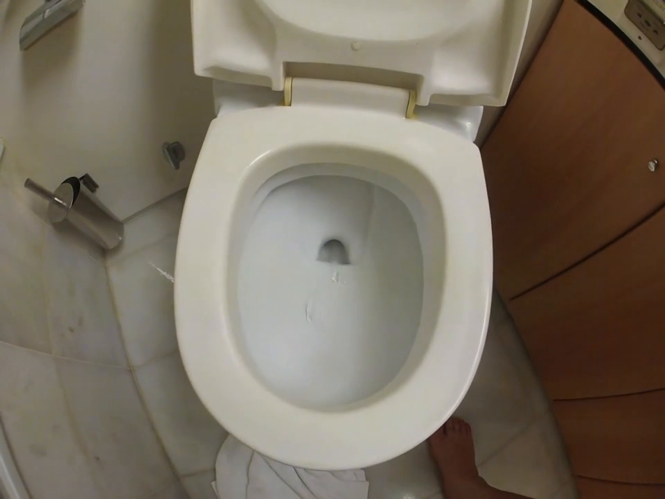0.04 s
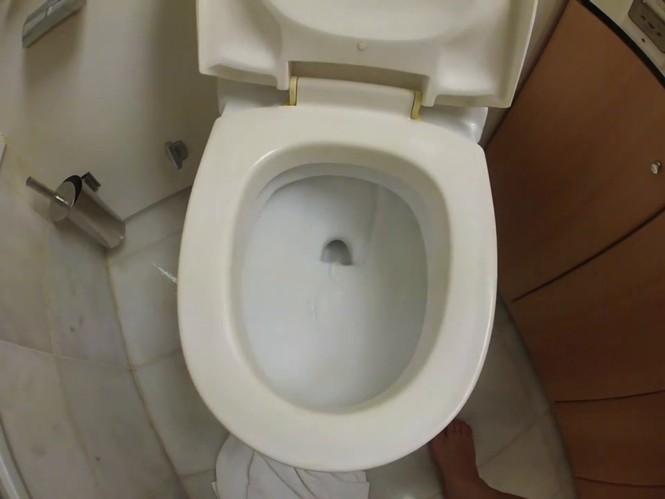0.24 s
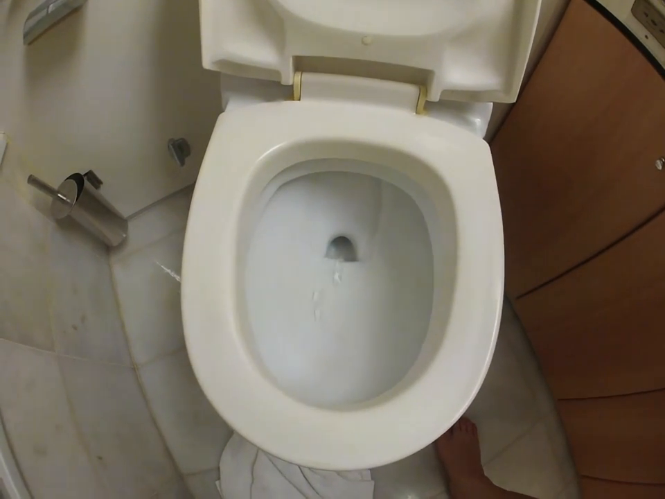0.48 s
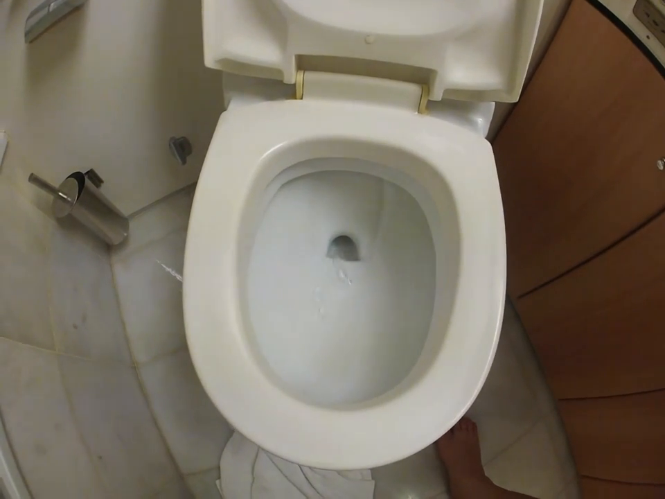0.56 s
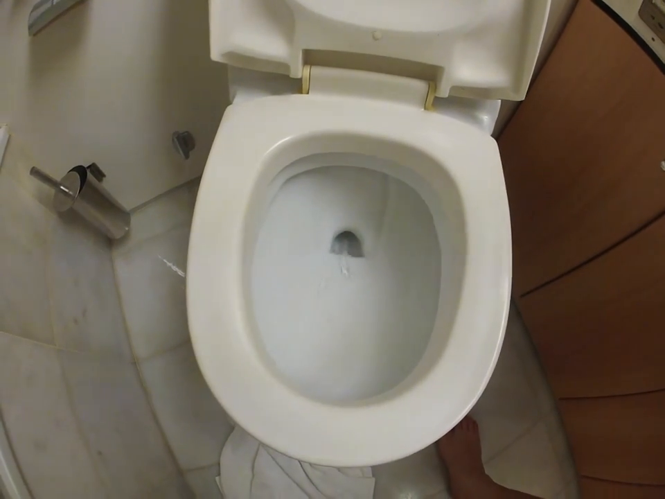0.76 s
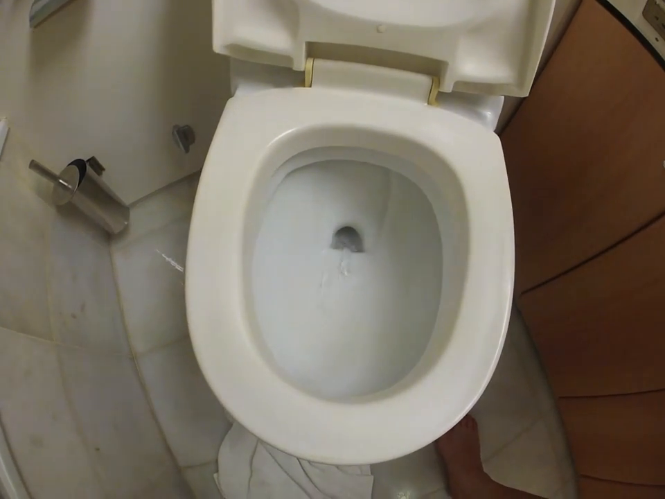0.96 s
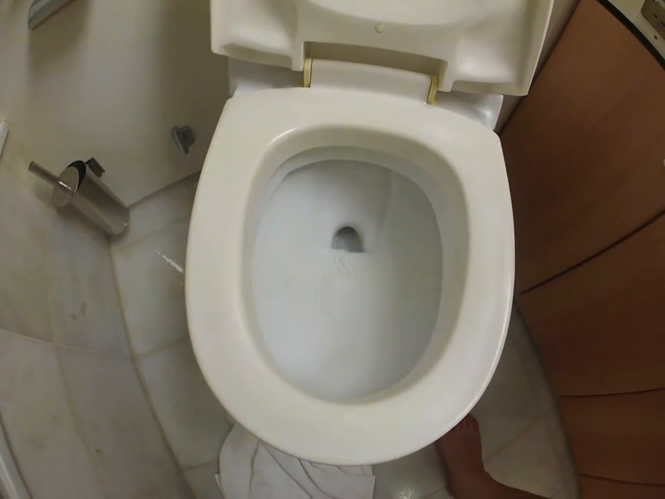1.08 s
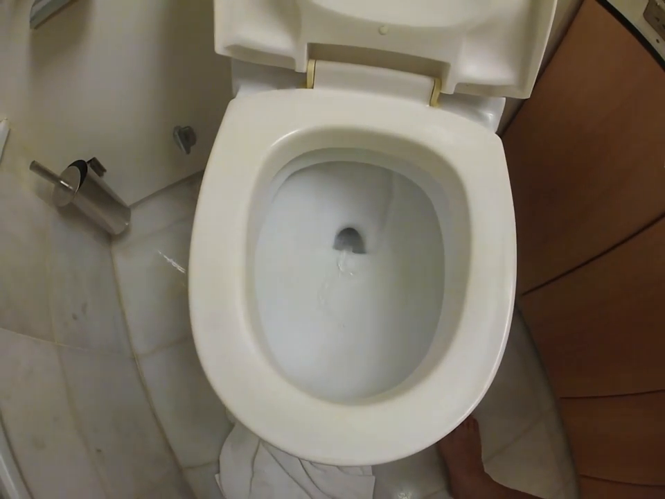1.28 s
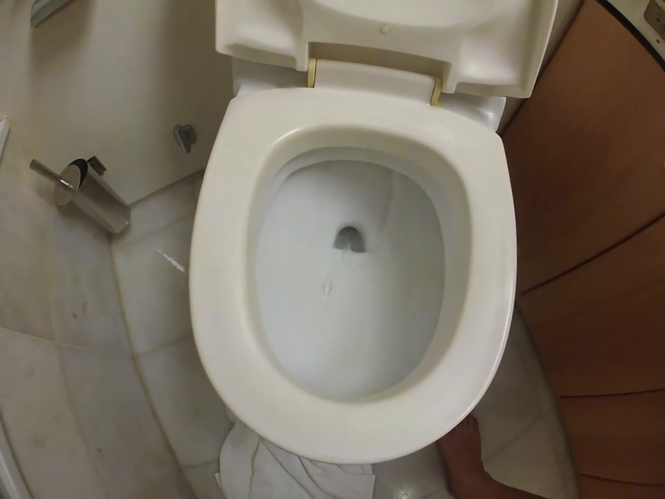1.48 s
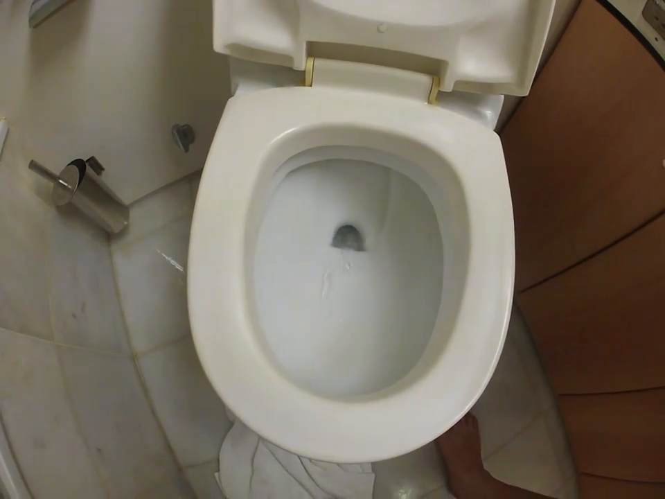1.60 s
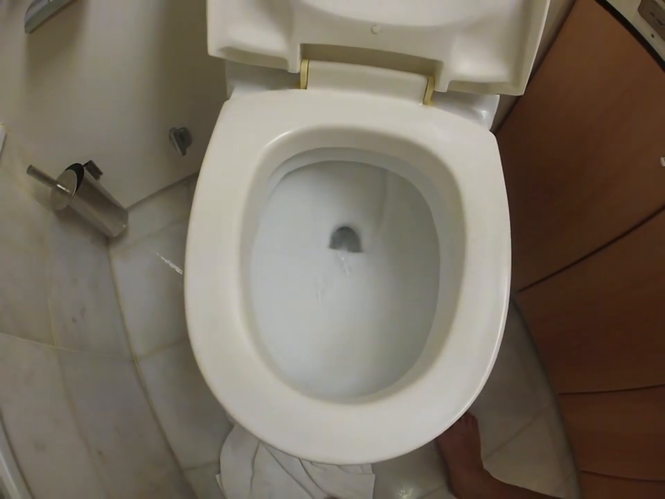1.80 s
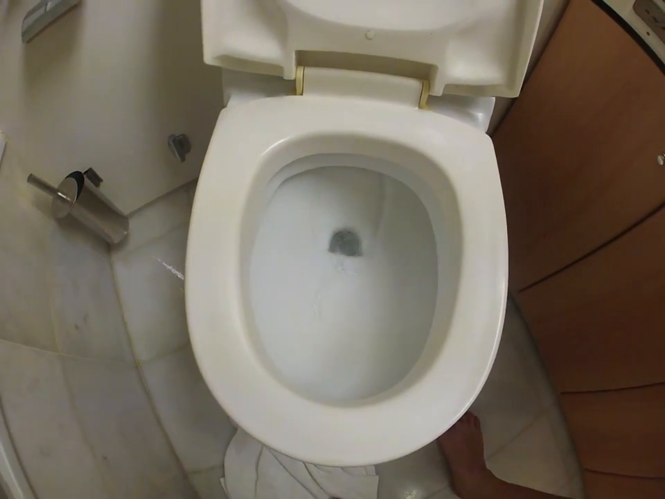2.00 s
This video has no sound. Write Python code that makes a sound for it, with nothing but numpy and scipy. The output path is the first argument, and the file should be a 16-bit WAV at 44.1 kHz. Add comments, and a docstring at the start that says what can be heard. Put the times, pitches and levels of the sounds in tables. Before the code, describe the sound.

A vacuum toilet flush rushes and booms in the bowl, then ends with a gulp and a hissing sputter. Faint trickling, drips and small plops follow, heard close by in a small bathroom.

```python
"""Vacuum toilet flush

Air rushes down the drain and booms in the bowl, then slurps, gulps and sputters as the valve closes.
The small bathroom rings out over a low background rumble. The last water trickles and drips into
the bowl, with fizzing bubbles and a few plops from the drain."""
import sys
import numpy as np
from scipy import signal
from scipy.fft import rfft, irfft
from scipy.io import wavfile
from scipy.ndimage import uniform_filter1d

SR = 44100
rng = np.random.default_rng(int(sys.argv[2]) if len(sys.argv) > 2 else 0)


def master(y):
    """Save y as 16-bit WAV."""
    cut = np.clip(np.atleast_2d(y).T, -1, 1)
    pcm = np.round(cut * 32767)  # scale
    wavfile.write(sys.argv[1], SR, pcm.astype(np.int16))


N = 90404
T = np.arange(N) / SR
HZ = np.fft.rfftfreq(2 * N, 1 / SR)


def undb(db):
    """Decibels to gain."""
    return 10 ** (np.asarray(db) / 20)


def unit(x):
    """Scale to rms 1."""
    return x / np.sqrt(np.mean(x ** 2))


def steady(x, samples):
    """Ride the level to rms 1 over a sliding window."""
    return x / np.sqrt(uniform_filter1d(x ** 2, samples))


def fader(points):
    """Gain over time from (time [s], level [dB]) points."""
    return undb(np.interp(T, *np.array(points).T))


def burst(start, rise):
    """Envelope that swells to 1 over the rise time and dies away."""
    age = np.clip((T - start) / rise, 0, 50)
    return age * np.exp(1 - age)


def eq(points):
    """Gain over frequency from (frequency [Hz], level [dB]) points."""
    hz, db = np.array(points).T
    return undb(np.interp(np.log(HZ + 1), np.log(hz), db))


def bell(hz, width_hz):
    """Power curve of one resonance, 1 at its centre."""
    return abs(1j * HZ * width_hz / (hz ** 2 - HZ ** 2 + 1j * HZ * width_hz)) ** 2


def cavity(modes):
    """EQ of a cavity: flat, with a peak or a dip at each resonance."""
    return undb(sum(db * bell(hz, width) for hz, width, db in modes))


def shape(x, response):
    """Filter by a frequency response."""
    return irfft(rfft(x, 2 * N) * response)[:N]


def causal(gain):
    """Minimum-phase response with the given gains: it rings only after a hit."""
    cepstrum = irfft(np.log(gain + 1e-9))
    return np.exp(rfft(np.r_[cepstrum[0], 2 * cepstrum[1:N], np.zeros(N)]))


def noise(gain):
    """Noise of rms 1 with the given EQ."""
    return unit(shape(rng.standard_normal(N), gain))


def droplets(per_s, spread_db):
    """Random clicks of uneven size."""
    chance, size, sign = rng.random(N), rng.standard_normal(N), rng.choice([-1, 1], N)
    return unit((chance < per_s / SR) * sign * undb(spread_db * np.clip(size, -2, 2)))


def flutter(rate_hz, depth_db):
    """Random wobble of level."""
    window = max(int(SR / rate_hz), 1)
    wobble = uniform_filter1d(uniform_filter1d(rng.standard_normal(N), window), window)
    return unit(undb(depth_db * unit(wobble)))


# tone of the background (frequency [Hz], relative level [dB])
ROOM_TONE_EQ = [(20, -13), (78, 1.5), (130, -7.5), (300, -9), (500, -16.5), (1000, -29.5), (2500, -25.5),
                (4800, -27), (6000, -35.5), (9000, -29.5), (15000, -60)]
def room_tone(level_db=-60):
    """A quiet, even bed of rumble under the whole scene."""
    return undb(level_db) * noise(eq(ROOM_TONE_EQ))


# upper resonances and dips of the bowl (frequency [Hz], width [Hz], boost [dB])
BOWL_MODES = [(432.4, 23, 10.5), (553, 41, 10), (728.3, 55, 14), (776.4, 67, 12.5), (866, 26, -8),
              (937, 36, 13.5), (1058, 70, 17.5), (1293, 130, 11), (1570, 98, 13.5), (1715, 20, 6),
              (2116, 58, 10), (2340, 210, 10), (2599, 30, 7.5), (2820, 39, -12), (3170, 140, 6.5),
              (9600, 260, 7.5)]
# swell of air through the drain (time [s], level [dB])
RUSH_FADER = [(0, -40), (.1, -40), (.21, -41), (.27, -38.5), (.32, -40), (.4, -35.5), (.455, -35.5),
              (.482, -27.5), (.515, -29), (.56, -38.5), (.61, -52), (.66, -48), (.75, -110)]
# tone of the rushing air (frequency [Hz], relative level [dB])
RUSH_EQ = [(100, -34), (160, -15), (300, -3), (620, -7), (1100, -6), (2400, -3), (3300, -6.5),
           (4200, -10.5), (5200, -6.5), (6000, -25), (6800, -9), (8000, -16.5), (9600, -10.5), (12000, -22),
           (15000, -10.5)]
def rush(bowl):
    """Turbulent air laden with droplets, coloured by the bowl."""
    spatter = undb(-5.5) * droplets(per_s=1500, spread_db=4)
    air = unit(rng.standard_normal(N) + spatter) * flutter(rate_hz=74, depth_db=0.9)
    return shape(air * fader(RUSH_FADER), causal(unit(eq(RUSH_EQ) * bowl)))


# surges of the bowl's boom (time [s], level [dB])
BOOM_FADER = [(0, -46), (.1, -38.5), (.125, -38.5), (.155, -33), (.22, -46), (.26, -35.5), (.32, -45),
              (.4, -31.5), (.445, -46.5), (.478, -29.5), (.515, -26), (.57, -32.5), (.65, -44), (.8, -61.5),
              (1.1, -105)]
# low air resonances of the bowl (frequency [Hz], half-width [Hz], relative level [dB])
BOOM_MODES = [(202.6, 10, 2), (254, 16, 3), (288, 16, 1.5), (317, 12, -3.5)]
def boom(pitch_hz=250.8, wander_hz=4, rough_db=-7):
    """Airflow keeps the bowl's main resonance sounding; it flutters and beats with its neighbours."""
    wander = wander_hz * unit(uniform_filter1d(rng.standard_normal(N), size=1500))
    tone = np.sqrt(2) * np.sin(2 * np.pi * np.cumsum(pitch_hz + wander) / SR)
    throb = flutter(rate_hz=90, depth_db=1.6)
    neighbours = noise(sum(undb(db) * bell(hz, 2 * half) for hz, half, db in BOOM_MODES))
    roughness = undb(rough_db) * steady(neighbours, samples=2000)
    return unit(tone * throb + roughness) * fader(BOOM_FADER)


# rumble in the drain (time [s], level [dB])
RUMBLE_FADER = [(0, -51.5), (.16, -49.5), (.24, -57), (.39, -56), (.45, -48), (.48, -40), (.52, -84),
                (.6, -100)]
# bass weight of the rumble (frequency [Hz], relative level [dB])
RUMBLE_EQ = [(45, -18), (78, 5), (160, -7), (300, -22)]
def rumble():
    """The drain rumbles under the rush and drops out at the gulp."""
    return noise(eq(RUMBLE_EQ)) * fader(RUMBLE_FADER)


# spray torn through the closing valve (time [s], level [dB])
SPRAY_FADER = [(0, -57), (.35, -43), (.455, -38), (.484, -32), (.53, -24.5), (.59, -32), (.62, -31),
               (.66, -58), (.73, -100)]
# slugs of water spat through the last gap (time [s], relative level [dB])
SPUTTERS = [(.547, -33), (0.562, -32), (0.576, -28), (0.587, -25.5), (0.605, -32), (.610, -32),
            (0.618, -37), (0.643, -35)]
# hiss of the valve gap (frequency [Hz], relative level [dB])
GAP_EQ = [(200, -36), (900, -29), (1900, -3), (2500, 6), (2950, -1.5), (3500, 5), (4300, -27), (5250, -3.5),
          (5950, -23), (6700, -4.5), (7700, -32), (8600, -1), (9600, -4.5), (10400, -11), (11600, -103),
          (13000, -33), (14500, 0.5), (15500, -22)]
def valve(bowl):
    """Spray hisses in the narrowing gap and breaks up into separate slugs."""
    spray = fader(SPRAY_FADER) * flutter(rate_hz=61, depth_db=3.5)
    slugs = undb(3) * sum(undb(db) * burst(start, rise=.0012) for start, db in SPUTTERS)
    hiss = rng.standard_normal(N) * np.hypot(spray, slugs)
    return shape(hiss, causal(unit(eq(GAP_EQ) * bowl)))


# air slurping through the emptying drain (time [s], level [dB])
SLURP_FADER = [(.4, -47), (.455, -39.5), (.468, -32.5), (.49, -24.5), (.53, -33.5), (.585, -33.5),
               (.65, -79)]
# hollow ring of the drain (frequency [Hz], width [Hz], relative level [dB])
SLURP_MODES = [(1527, 33, -3.5), (1653, 31, -7.5), (1738, 31, 0.5), (2600, 66, 3.5), (2765, 20, 0),
               (3257, 52, -7), (3600, 93, -15.5)]
def slurp():
    """Air breaks through the last water and rings the drain in one sustained, hollow surge."""
    ring = noise(sum(undb(db) * bell(hz, width) for hz, width, db in SLURP_MODES))
    gate = T < SLURP_FADER[-1][0]
    return steady(ring, samples=500) * fader(SLURP_FADER) * gate


# body of the gulp (frequency [Hz], relative level [dB])
GULP_EQ = [(120, -68), (200, -14), (270, 11.5), (320, -2), (370, -15.5), (440, -7), (700, -34.5)]
def gulp(bowl, level_db=-28):
    """The drain swallows the last water at once, with a hollow thump."""
    body = steady(noise(eq(GULP_EQ) * bowl), samples=900)
    return body * burst(start=.4555, rise=.037) * undb(level_db)


# hollow rings of the shallow pool (frequency [Hz], width [Hz], boost [dB])
POOL_MODES = [(750, 23, 11), (1556, 50, 8.5), (2110, 61, 10), (2360, 260, 12), (3170, 73, 6.5)]
# tick of water on the glaze, shared with the drips (frequency [Hz], relative level [dB])
TICK_EQ = [(300, -34.5), (1200, -1.5), (2400, 3.5), (3600, 7.5), (4400, 1.5), (5300, 9.5), (6000, -3),
           (6700, 5.5), (9700, -5), (11500, -30), (13000, -15), (14300, 0), (15500, -20)]
# thin stream running down the bowl, shared with the fizz (time [s], level [dB])
TRICKLE_FADER = [(.6, -80), (1.1, -71), (1.3, -69.5), (1.55, -63), (2.05, -67)]
def trickle(pool):
    """Tiny droplets patter in the bowl."""
    warmth = eq([(700, 24.5), (2000, 1.5), (4000, -10), (14000, 2.5)])
    patter = droplets(per_s=500, spread_db=5.5) * fader(TRICKLE_FADER)
    return shape(patter, causal(unit(eq(TICK_EQ) * warmth * pool)))


def fizz(per_s=70, centre_hz=2400, spread_octaves=.75):
    """Tiny bubbles burst in the stream, each at its own pitch and strength."""
    pings, count = np.zeros(N), int(per_s * N / SR)
    for k, (jitter, pitch, size) in enumerate(rng.uniform(-1.1, 1, (count, 3))):
        start = (k + jitter) / per_s
        hz = centre_hz * 2 ** (spread_octaves * pitch)
        pings += 2 ** size * burst(start, rise=.0015) * np.sin(2 * np.pi * hz * (T - start))
    return unit(pings) * undb(-5.5) * fader(TRICKLE_FADER)  # tucked under the trickle


# drops landing (time [s], relative ring level [dB], pitch [Hz], relative tick level [dB])
DRIPS = [(0.7533, -74, 2370, -57.5), (0.828, -53, 1300, -67.5), (0.9094, -52, 3780, -60),
         (0.9996, -77, 3570, -62.5), (1.0291, -59, 1350, -59.5), (1.115, -65, 2410, -61.5),
         (1.150, -41, 2600, -61), (1.17, -52, 2360, -60.5), (1.265, -61, 2400, -63),
         (1.38, -44.5, 2950, -60.5), (1.4107, -47, 2600, -67), (1.4585, -44, 1980, -59.5),
         (1.5464, -44.5, 2600, -79), (1.584, -46.5, 2500, -61), (1.607, -68, 2550, -56.5),
         (1.623, -44, 2110, -63), (1.634, -68, 2300, -65), (1.697, -51, 2310, -54),
         (1.7333, -52, 1690, -67.5), (1.779, -42, 2110, -80), (1.7976, -44.5, 1640, -75),
         (1.884, -49.5, 1920, -82), (1.928, -41, 2250, -63), (1.9839, -45, 1680, -57),
         (1.9958, -44, 2300, -66), (2.013, -38.5, 2350, -61)]
# squirt at the drain (frequency [Hz], relative level [dB])
SQUIRT_EQ = [(900, -15.5), (1550, -11), (3100, -7), (4200, -32), (8000, -30), (9700, 2.5), (11800, -49),
             (14300, -7)]
def drips(pool):
    """Each drop ticks on the glaze, then splats with a pitched ring and a small squirt at the drain."""
    rings, tick_envelope, squirt_envelope = 0, 0, 0
    for time, ring_db, hz, tick_db in DRIPS:
        splat = undb(ring_db - 7) * burst(time - .001, rise=.0034)
        band = bell(hz, width_hz=.36 * hz)
        pool_gain = np.sqrt(np.mean((unit(band) * pool) ** 2))  # divided out: colour without boost
        rings += splat * steady(noise(band), samples=200) / pool_gain
        squirt_envelope += undb(-5) * splat
        tick_envelope += undb(tick_db + 6) * burst(time - .001, rise=.0016)
    ticks = tick_envelope * noise(eq(TICK_EQ))
    squirts = squirt_envelope * noise(eq(SQUIRT_EQ) * pool)
    return shape(rings, causal(pool)) + ticks + squirts


# air bubbles gulped in the drain (time [s], level [dB], pitch [Hz])
BUBBLES = [(1.333, -46, 1600), (1.34, -39, 1410), (1.346, -36.5, 1318), (1.371, -48, 1330),
           (1.386, -47.5, 1300), (1.508, -48.5, 1570), (1.786, -48.5, 2720), (1.924, -47, 1576),
           (2.019, -48, 2340)]
# splash of a bursting bubble (frequency [Hz], relative level [dB])
SPLASH_EQ = [(700, -15), (1500, 2), (3200, -6), (4300, -11.5), (8000, -17), (10600, -4), (11800, -39),
             (14000, -7)]
def bubbles(sag_per_s=2.2, splash_db=-10.5):
    """Short plops that sag slightly in pitch, each with a splash as it bursts."""
    plops, splash_envelope = 0, 0
    for time, db, hz in BUBBLES:
        age = T - time
        tone = np.sin(2 * np.pi * hz * age * (1 - sag_per_s * age / 2))
        plops += undb(db) * burst(time - .001, rise=.0022) * tone
        splash_envelope += undb(db + splash_db) * burst(time - .003, rise=.0026)
    return plops + splash_envelope * noise(eq(SPLASH_EQ))


def tail(t60_s, db):
    """Dense echoes that die away after a 1.5 ms pre-delay."""
    echoes = rng.standard_normal(N) * undb(-60 * T / t60_s) * (T > .0015)
    return undb(db) * echoes / np.linalg.norm(echoes)


def bathroom(x, bowl_db, room_db):
    """Direct sound, quick reflections inside the bowl and the ring of a small hard room, even in tone."""
    impulse = (T == 0) + tail(t60_s=.1, db=bowl_db) + tail(t60_s=.32, db=room_db)
    response = rfft(impulse, 2 * N)
    colouration = np.sqrt(uniform_filter1d(abs(response) ** 2, size=220))
    return shape(x, response / causal(colouration))


def scene():
    """The flush, then the last water, over room tone; boom, gulp and rumble stay dry."""
    bowl, pool = cavity(BOWL_MODES), cavity(POOL_MODES)
    air = bathroom(rush(bowl), bowl_db=-6, room_db=-8)
    closing = bathroom(valve(bowl) + slurp(), bowl_db=.5, room_db=-11.5)
    low_end = boom() + gulp(bowl) + rumble()
    water = bathroom(trickle(pool) + fizz() + drips(pool), bowl_db=3, room_db=-2.5)
    plops = bathroom(bubbles(), bowl_db=-3, room_db=-8)
    return (air + closing + low_end + water + plops + room_tone())[None]


def record(dry):
    """The microphone cuts the top end steeply."""
    top_hz = 15250
    return signal.sosfilt(signal.ellip(10, .2, 80, top_hz, fs=SR, output="sos"), dry)


dry = scene()
out = record(dry)
master(out)
```